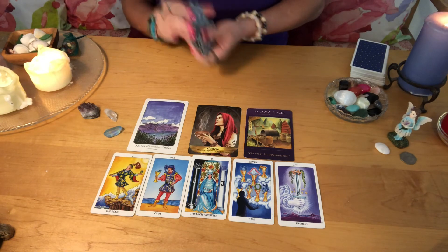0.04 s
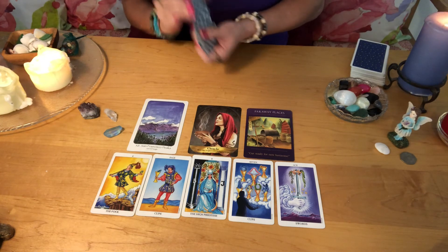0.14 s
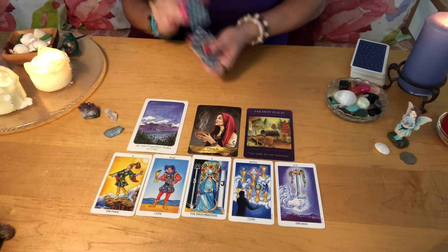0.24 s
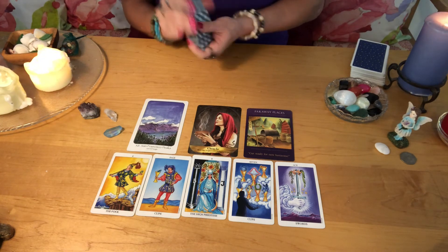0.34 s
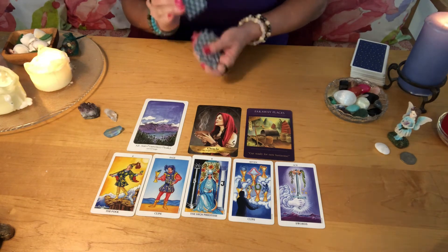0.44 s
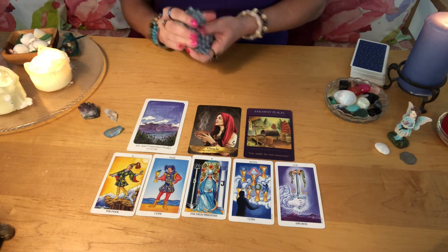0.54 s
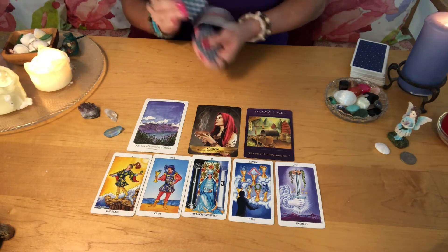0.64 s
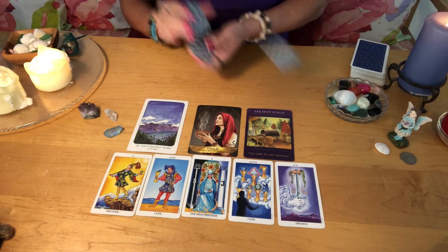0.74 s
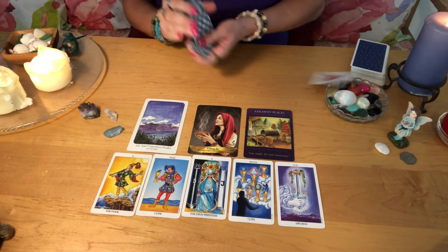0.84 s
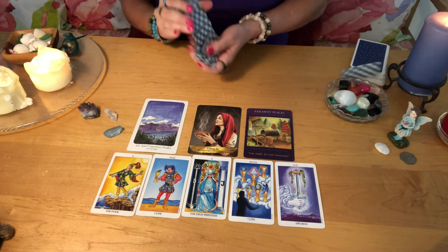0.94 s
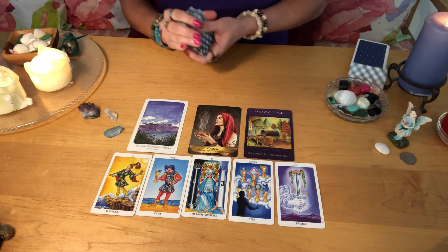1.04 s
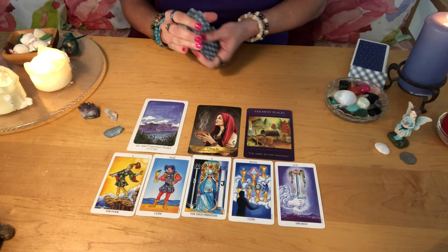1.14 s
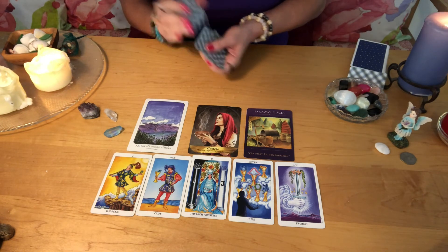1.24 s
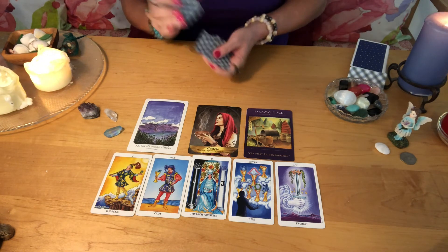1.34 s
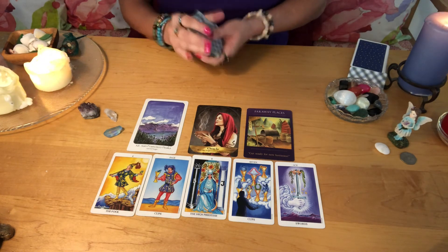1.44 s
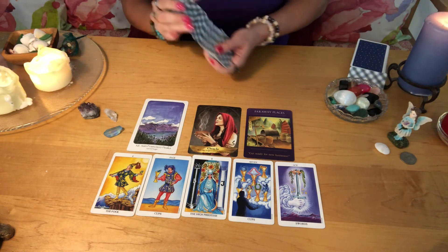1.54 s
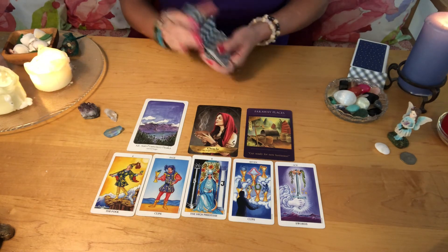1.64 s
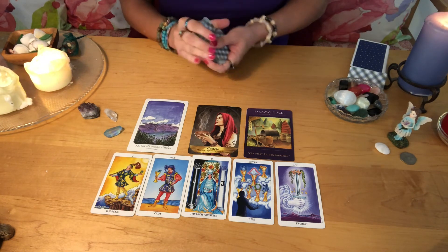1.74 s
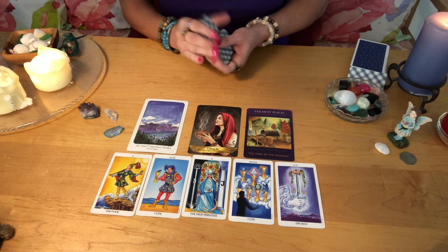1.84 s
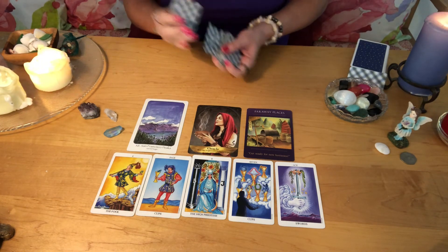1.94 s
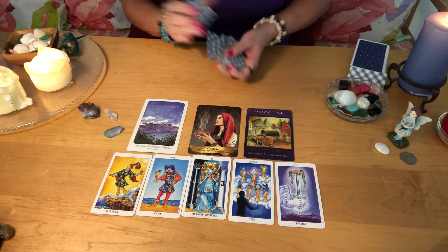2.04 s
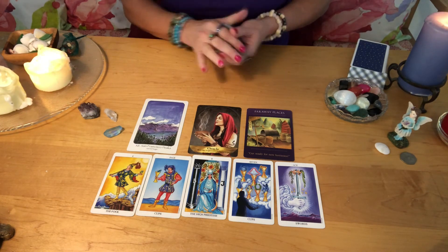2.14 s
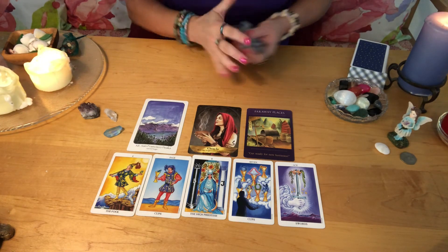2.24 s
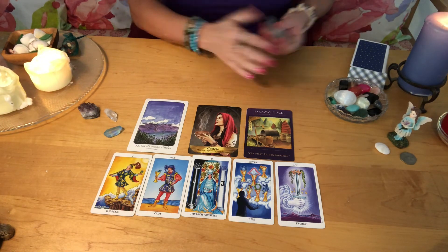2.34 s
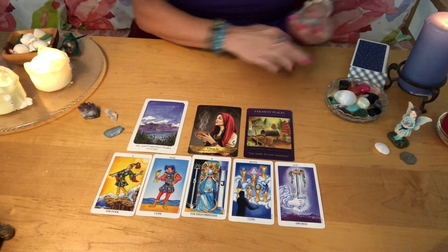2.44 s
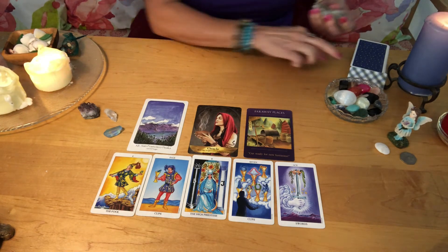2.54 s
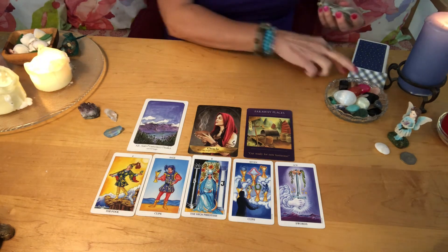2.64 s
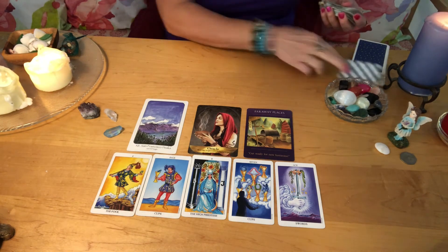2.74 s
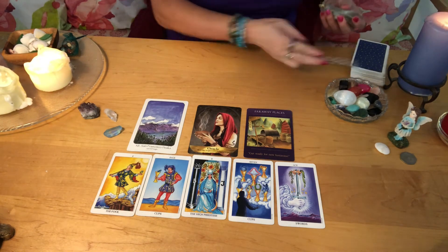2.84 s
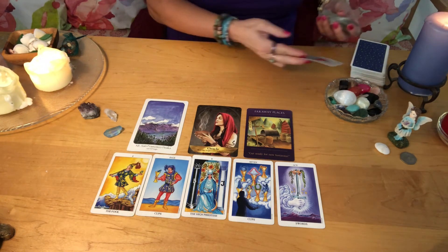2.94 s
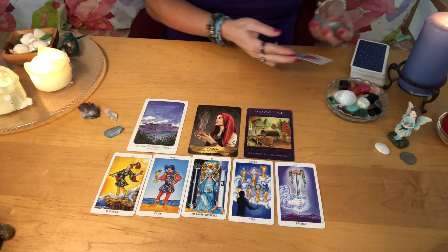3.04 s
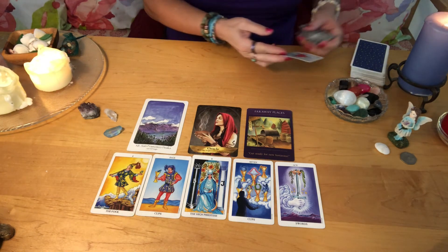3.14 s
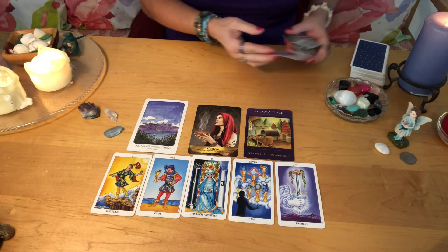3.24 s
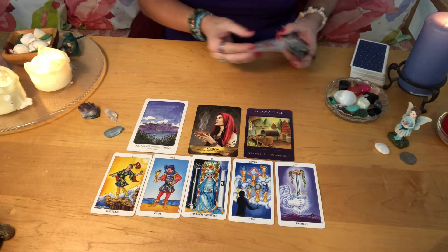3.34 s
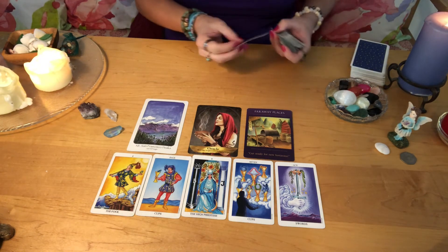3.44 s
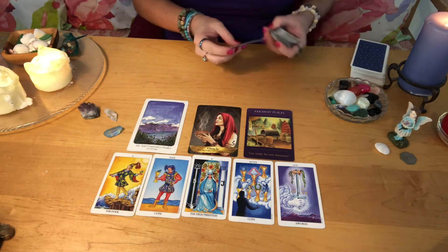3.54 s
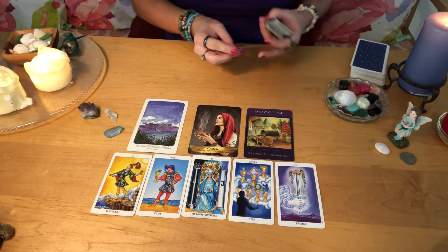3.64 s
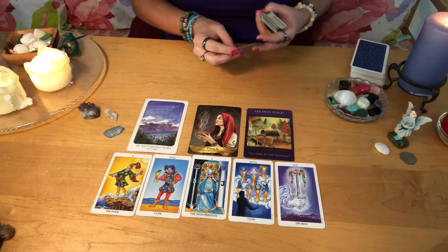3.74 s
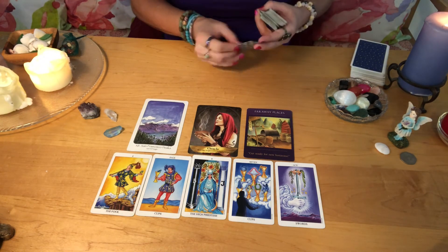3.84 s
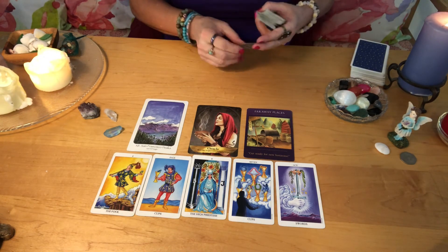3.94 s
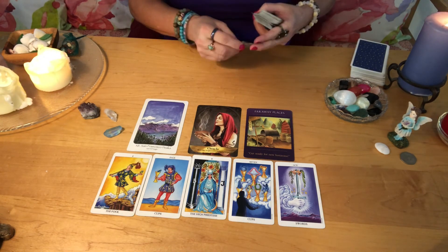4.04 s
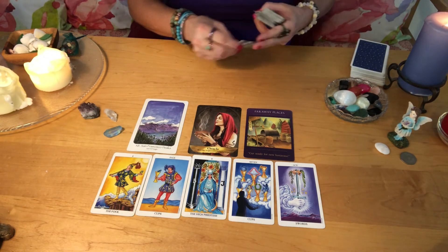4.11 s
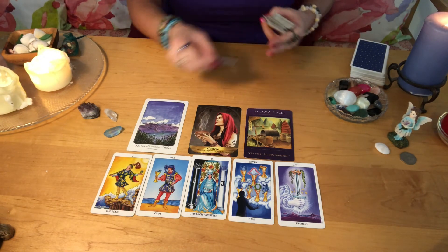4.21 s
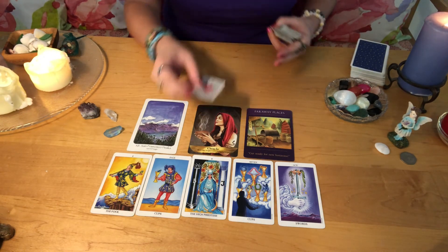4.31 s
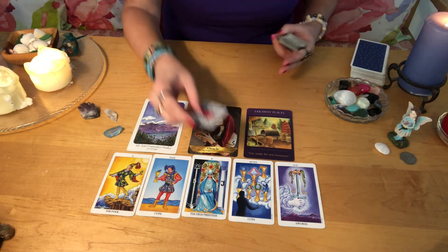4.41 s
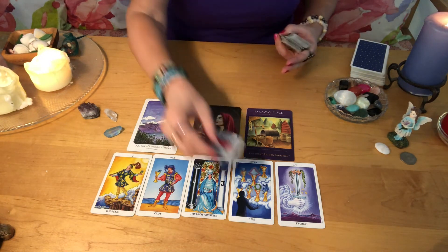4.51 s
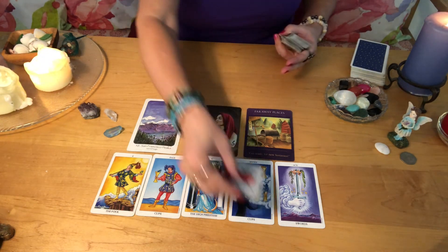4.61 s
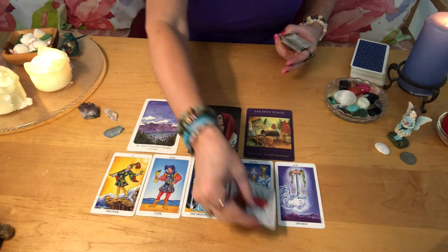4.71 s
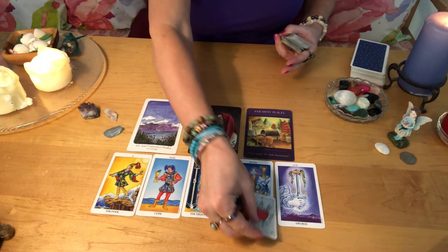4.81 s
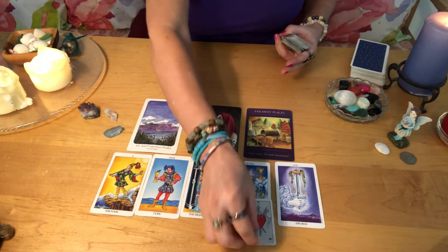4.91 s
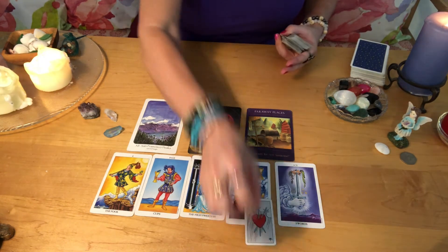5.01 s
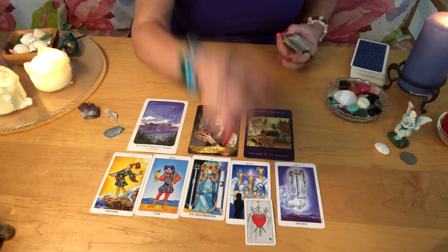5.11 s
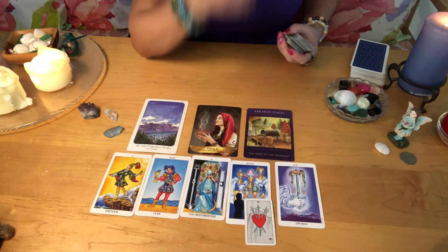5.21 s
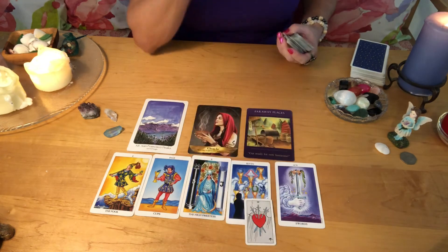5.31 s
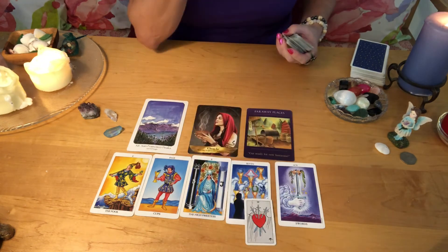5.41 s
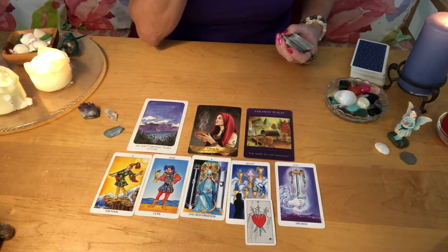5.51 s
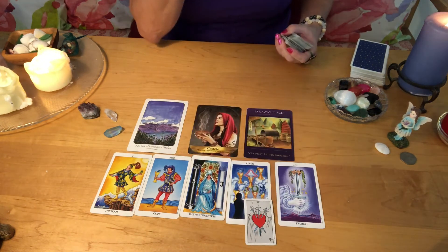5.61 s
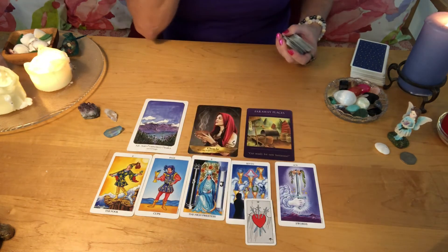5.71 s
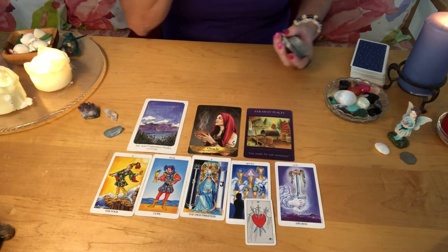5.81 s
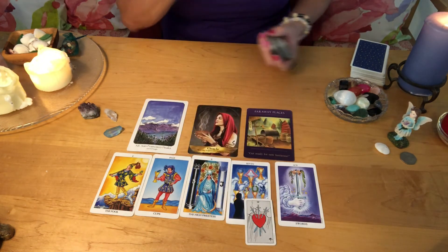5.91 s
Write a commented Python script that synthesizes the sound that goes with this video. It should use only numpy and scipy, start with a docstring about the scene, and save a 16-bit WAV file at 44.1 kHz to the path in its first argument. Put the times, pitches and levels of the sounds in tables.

```python
"""Tarot cards at a wooden table in a small, quiet room, close to the microphone.
For the first two seconds they are shuffled overhand: packets slide and clap onto the deck, and early on
a run of cards spills. The deck is squared with light ticks and rubs. Just after 4 s a stray card is
picked up and flicked; near 5 s one card is snapped down and the table top rings. Throughout, the walls
answer every click, and a low room rumble, mains hum and microphone hiss lie underneath."""
import sys
import numpy as np
from scipy import signal
from scipy.fft import rfft, irfft, next_fast_len
from scipy.io import wavfile
from scipy.ndimage import map_coordinates

SR = 44100
rng = np.random.default_rng(int(sys.argv[2]) if len(sys.argv) > 2 else 0)


def digitize_waveform(pressure):
    """Quantize a signal to 16-bit integers and store it at the path in sys.argv[1].

    Rows of a 2-D input are taken as channels; values are limited to [-1, 1].
    """
    field = np.atleast_2d(pressure).T
    bounded = np.clip(field, -1, 1)
    quanta = np.round(bounded * 32767).astype(np.int16)
    wavfile.write(sys.argv[1], SR, quanta)


N = 263012

HAND_ROOM_DB, TABLE_ROOM_DB = 0.5, -3  # room send from the hands, and from the table nearer the mic
TICK_T60_S = 0.019  # chatter of a light tick
LIGHT_SLAP_DB = -12.5  # a fingernail or a loose card hardly slaps

# Packets landing on the deck, close to the microphone: (time [s], level [dB], chatter t60 [s],
# flex pitch [Hz], slap [dB], edge [dB], slide-in level [dB], room send [dB])
PACKET_CLAPS = [(0.057, -29.5, 0.07, 2600, -11, -11, -56, 2),
                (0.1751, -28, 0.026, 3570, -2, -21, -41, -1.5),
                (0.2969, -20.5, .022, 2160, -14, -21, -48, 1.5),
                (0.3971, -21, 0.015, 4300, -5.5, -7, -46, 2.5),
                (.534, -24, 0.01, 3390, -9.5, -11.5, -60, 0),
                (0.6387, -24.5, 0.0097, 1240, -7, -12.5, -37.5, 0.5),
                (0.7752, -34, 0.028, 3200, -1.5, -16, -58, 2),
                (1.2472, -26.5, 0.019, 3370, -3, -29, -39, -1.5),
                (1.417, -26.5, 0.027, 4040, -7, -11.5, -53, 2.5),
                (1.6809, -20, .0026, 4570, -25, -37, -38.5, -18),
                (1.7445, -35, 0.023, 1730, -1.5, -15, -42.5, 1),
                (1.923, -31, .022, 1700, -3, -9, -47, -2.5), (2.221, -34.5, 0.011, 5050, -4, -6, -50, -1.5)]


def packets(deck_hz=402, deck_t60=0.02, deck_lag_s=0.00303, deck_db=-10.5):
    """Each packet slides in and claps onto the deck, which gives under it with a low knock."""
    contacts, strokes, pushes = [], [], []
    for s, db, t60, flex_hz, slap_db, edge_db, slide_db, room_db in PACKET_CLAPS:
        contacts.append((s, db, t60, flex_hz, slap_db, edge_db, room_db))
        strokes.append(slide_in(s, slide_db))
        pushes.append((s + deck_lag_s, db + slap_db + deck_db, deck_hz, deck_t60))
    return contacts, strokes, pushes


def spill(start_s=0.7842, gap_s=0.0155, count=5, db=-28, taper_db=5.5, flex_hz=3200):
    """A run of cards drops off the packet at an even pace, loudest midway."""
    t60, slap_db, edge_db = 0.012, -6, -13
    levels = db - taper_db * np.abs(np.linspace(-1, 1, count))
    return [(start_s + k * gap_s, level, t60, flex_hz, slap_db, edge_db, HAND_ROOM_DB)
            for k, level in enumerate(levels)]


SNAP_S, SNAP_DB = 4.8968, -16
# Corner, edge and face meeting the table:
# (time before the snap [s], level relative to it [dB], chatter t60 [s], slap [dB], edge [dB])
SNAP_LANDING = [(.0035, -10.5, .0012, -20.5, -8), (0.00079, -6.5, 0.0034, -8, -0.5),
                (0.00017, -1, 0.0077, -9, -9.5)]


def snap(flex_hz=7200, slide_db=-48):
    """The drawn card is snapped down near the microphone, landing in three quick contacts."""
    contacts = [(SNAP_S - early, SNAP_DB + db, t60, flex_hz, slap_db, edge_db, TABLE_ROOM_DB)
                for early, db, t60, slap_db, edge_db in SNAP_LANDING]
    return contacts, [slide_in(SNAP_S, slide_db)]


# Modes of the wooden table top: (pitch [Hz], level relative to the snap [dB], t60 [s])
TABLE_MODES = [(173, -42, .3), (345, -19, 0.028), (450, -35.5, 0.27)]


def table_top(lag_s=0.00287):
    """The snapped card sets the wood ringing."""
    return [(SNAP_S + lag_s, SNAP_DB + db, hz, t60) for hz, db, t60 in TABLE_MODES]


FLICK_S = 4.1468


def flick(db=-30.5, t60=0.013, flex_hz=4850, slap_db=-25, edge_db=-11, room_db=-8, slide_db=-49.5):
    """A bent card slips and springs free of the fingers with a click."""
    return [(FLICK_S, db, t60, flex_hz, slap_db, edge_db, room_db)], [slide_in(FLICK_S, slide_db)]


# Ringing bands of the flicked card: (centre [Hz], width [Hz], level [dB])
FLICK_BANDS = [(3540, 200, -58.5), (4350, 360, -50), (4870, 131, -60), (6200, 530, -62), (7850, 620, -60.5)]


def flick_ring(t60=0.36, attack_s=0.0015, twang_hz=4650, twang_db=-25, twang_s=0.00082, lag_s=0.00124):
    """The flicked card twangs for a few cycles and leaves a thin ring in a few narrow bands."""
    out, t = np.zeros(N), np.arange(-SR // 100, SR // 2) / SR
    after = np.maximum(t, 0)
    twang = amp(twang_db) * np.exp(-np.abs(t) / twang_s) * np.sin(2 * np.pi * twang_hz * t)
    ring = sum(amp(db) * noise_band(hz, width, len(t)) for hz, width, db in FLICK_BANDS)
    envelope = amp(-60 * after / t60) * (1 - np.exp(-after / attack_s))
    add(out, FLICK_S + lag_s + t[0], twang + ring * envelope)
    return out


# Light ticks, from single cards catching and two wall echoes just after louder clicks:
# (time [s], level [dB], flex pitch [Hz], slap [dB], edge [dB])
LIGHT_TICKS = [(.0097, -40.5, 1030, -9.5, -19), (.0828, -36, 2530, -10, -11), (.113, -39, 5000, -3, -7),
               (0.2861, -32.5, 2800, -7, -11), (0.8727, -34, 4960, -14, -15), (.992, -45.5, 1830, -6, -13),
               (1.041, -44.5, 2790, -7, -18), (1.0565, -41.5, 2760, -5, -16), (1.4277, -37, 960, -6, -7),
               (1.672, -26, 3450, -15.5, -14), (1.6905, -28.5, 3800, -7, -17),
               (1.8331, -41.5, 3130, -9, -9), (1.895, -31.5, 3660, -7, -7.5), (1.9077, -39, 1440, -10, -10),
               (2.1102, -40.5, 2160, -7, -9), (2.1345, -39.5, 3740, -4, -6),
               (2.6807, -42.5, 2850, -2.5, -22), (2.7026, -44.5, 2880, -17, -10),
               (2.7456, -38, 1130, -9.5, -6), (3.1914, -46.5, 5100, -1, -10), (3.505, -45, 2600, -25, -4.5),
               (3.7882, -51.5, 3700, -2, -12), (4.0748, -49.5, 2980, 0.5, -32),
               (4.3047, -39, 3850, -12.5, -9), (4.748, -53.5, 1930, -13, -29),
               (5.4091, -57.5, 3330, -4, -33)]


def light_ticks(slide_db=-17.5):
    """A brief, faint slide leads into each light tick."""
    contacts = [(s, db, TICK_T60_S, flex_hz, slap_db, edge_db, HAND_ROOM_DB)
                for s, db, flex_hz, slap_db, edge_db in LIGHT_TICKS]
    return contacts, [slide_in(s, db + slide_db) for s, db, *_ in LIGHT_TICKS]


# Fingernails on a card's edge: (time [s], level [dB])
NAIL_CLICKS = [(2.8171, -54), (2.8328, -46), (2.9253, -59.5), (5.182, -46.5), (5.2, -56)]


def fingernails(t60=0.01, flex_hz=8700, edge_db=12):
    """A nail's click sounds mostly the cut edge, well above the bending."""
    return [(s, db - edge_db, t60, flex_hz, LIGHT_SLAP_DB, edge_db, TABLE_ROOM_DB)
            for s, db in NAIL_CLICKS]


# Cards drawn across each other:
# (peak time [s], swell and fade time [s], level [dB], flex pitch [Hz], edge hiss [dB])
CARD_RUBS = [(.02, 0.026, -53, 1500, -17), (.372, .042, -45, 3200, -13.5), (.488, 0.04, -48, 4460, -24),
             (.782, .006, -35.5, 2370, -17), (.85, 0.036, -51, 2810, -17), (1.068, 0.021, -51, 2490, -16),
             (1.103, 0.0057, -42.5, 3800, -13), (1.183, 0.024, -45.5, 4000, -15),
             (1.455, 0.023, -57, 3400, -5), (1.5584, .012, -59, 7510, 4.5),
             (1.708, 0.021, -40.5, 2280, -24), (1.882, .016, -48, 4200, -12),
             (2.136, 0.0081, -40, 3370, -14), (2.182, .012, -47.5, 2640, -26), (2.69, .016, -57, 2620, -13),
             (3.501, 0.0076, -52.5, 2200, -18), (3.83, 0.15, -71.5, 5470, -5),
             (4.06, 0.032, -64.5, 4560, -7), (4.301, .006, -48, 3050, -11),
             (4.555, .02, -57.5, 2390, -11.5), (4.862, 0.025, -52, 3800, -10),
             (5.792, .013, -63.5, 4240, -12.5)]


def rubs(loose_count=4, loose_db=-3, spread_db=3.5, scatter=1.4):
    """A rub swells and fades while a few loose cards tick at random under it."""
    contacts, strokes = [], []
    for s, length, db, flex_hz, edge_db in CARD_RUBS:
        strokes.append((s, length, length, db, flex_hz, edge_db))
        times = s + scatter * length * rng.uniform(-1, 1, loose_count)
        levels = db + loose_db + spread_db * rng.standard_normal(loose_count)
        for when, level in zip(times, levels):
            contacts.append((when, level, TICK_T60_S, flex_hz, LIGHT_SLAP_DB, edge_db, HAND_ROOM_DB))
    return contacts, strokes


def squeak(peak_s=0.49, spread_s=0.056, hz=4560, width_hz=240, db=-58):
    """One long slide sings thinly in a narrow band."""
    out, t = np.zeros(N), np.arange(-SR // 5, SR // 5) / SR
    swell = np.exp(-(t / spread_s) ** 2)
    add(out, peak_s + t[0], amp(db) * swell * noise_band(hz, width_hz, len(t)))
    return out


# Spectra at the microphone, each (frequency [Hz], level [dB])
FLEX_SPECTRUM = [(251, -17.5), (901, 0), (2201, 2), (5001, -0.5), (7801, -2.5), (8501, -13), (16001, -18)]  # the card's bending as the microphone hears it, duller above 8 kHz
SLAP_SPECTRUM = [(110, -38), (240, -10), (380, -2), (600, 0), (1000, -0.5), (1500, -9), (3000, -32),
                 (8000, -52.5)]  # air between flat faces
EDGE_SPECTRUM = [(2001, -41), (5501, -6.5), (7501, -8.5), (8601, 1.5), (10801, -3.5), (13001, -5.5),
                 (16001, -7)]  # the cut edge


def card(push, flex_hz, slap_db, edge_db, broad_q, peak_gain, peak_q=7, lag_s=0.000812):
    """A pushed card sounds a broad bending resonance with a narrow peak, a low slap and a bright edge."""
    hz = np.fft.rfftfreq(len(push), 1 / SR) + 1
    detune = hz / flex_hz - flex_hz / hz
    resonance = 1 / (1 + 1j * broad_q * detune) + peak_gain / (1 + 1j * peak_q * detune)
    stiffness = (flex_hz / 3200) ** 0.52  # a tighter grip raises the slap too
    drive = rfft(push)
    bend = unit(drive * resonance * amp(along(FLEX_SPECTRUM, hz)))
    slap = amp(slap_db) * unit(drive * amp(along(SLAP_SPECTRUM, hz / stiffness)))
    edge = amp(edge_db) * unit(drive * amp(along(EDGE_SPECTRUM, hz)))
    # bending waves are slower at low pitch: the delay (lag_s at 1 kHz) falls with the root of frequency
    travel = np.exp(-4j * np.pi * lag_s * np.sqrt(1000 * hz))
    return irfft((bend + slap + edge) * travel, len(push))


def clicks(contacts, strike=3.32, scuff=0.52, scuff_s=0.0014, lead_s=0.00017, trim_db=-1.26):
    """Each contact is a short scuff, a sharp strike and a chatter of the cards behind it."""
    direct, diffuse = np.zeros(N), np.zeros(N)
    t = np.arange(-400, 1648) / SR
    impulse = 1.0 * (t == 0)
    for s, db, t60, flex_hz, slap_db, edge_db, room_db in contacts:
        force = np.where(t < 0, scuff * np.exp(-np.abs(t) / scuff_s), amp(-60 * np.abs(t) / t60))
        push = force * rng.standard_normal(len(t)) + strike * impulse
        gain = amp(db + trim_db) * np.sqrt(SR / 1000)  # energy counted over 1 ms
        start = s - lead_s + t[0]
        add(direct, start, gain * card(push, flex_hz, slap_db, edge_db, broad_q=1.03, peak_gain=0.95))
        # the room gathers sound from all directions, so the chatter's ripples average out
        thrown = card(impulse, flex_hz, slap_db, edge_db, broad_q=0.84, peak_gain=0.39)
        add(diffuse, start, room(gain * amp(room_db) * thrown))
    return direct, diffuse


def slide_in(s, db, lead_s=0.003, rise_s=0.0096, fall_s=0.0032, flex_hz=3400, edge_db=-8.5):
    """The short stroke that swells and stops just before a contact at time s."""
    return (s - lead_s, rise_s, fall_s, db, flex_hz, edge_db)


def slides(strokes, grain_db=3, clump_db=3.5, slap_db=-11, trim_db=-4.5):
    """Sliding faces catch and slip in tiny grains that swell and die with the stroke."""
    direct, diffuse = np.zeros(N), np.zeros(N)
    t = np.arange(-8192, 8192) / SR
    for s, rise, fall, db, flex_hz, edge_db in strokes:
        envelope = np.exp(-np.abs(t / np.where(t < 0, rise, fall)) ** 0.91)
        friction = envelope * rng.standard_normal(len(t))
        grains = amp(grain_db * wobble(850, len(t)) + clump_db * wobble(168.4, len(t)))
        gain = amp(db + trim_db) * np.linalg.norm(envelope)
        rub = gain * card(friction * grains, flex_hz, slap_db, edge_db, broad_q=0.71, peak_gain=0.3)
        add(direct, s + t[0], rub)
        add(diffuse, s + t[0], room(rub))
    return direct, diffuse


# Soft bumps of hand and table: (time [s], level [dB], pitch [Hz], t60 [s])
HAND_BUMPS = [(1.7421, -59, 60, .1), (2.2246, -32, 348, 0.01), (4.3762, -54, 167, 0.16)]


def knocks(pushes, attack_s=0.0004):
    """Each push or hand bump gives a damped low tone in deck or table; little radiates below it."""
    out, t = np.zeros(N), np.arange(SR // 3) / SR
    for s, db, hz, t60 in pushes + HAND_BUMPS:
        envelope = amp(db - 60 * t / t60) * (1 - np.exp(-t / attack_s))
        low_cut = signal.butter(2, hz / 2, "high", fs=SR)
        add(out, s, signal.lfilter(*low_cut, envelope * np.sin(2 * np.pi * hz * t)))
    return out


# Reflections at the microphone: (delay [s], level [dB])
WALL_ECHOES = [(0.01, -30), (0.012, -13), (0.016, -23.5), (.0216, -36)]


def walls(direct, trim_db=-3):
    """The nearest walls return the first echoes."""
    out = np.zeros(N)
    for delay, db in WALL_ECHOES:
        add(out, delay, amp(db + trim_db) * direct)
    return out


# Reverberation of the small room: (frequency [Hz], t60 [s])
ROOM_DECAY = [(201, 1), (601, 0.4), (2001, 0.48), (6001, 0.35), (14001, 0.3)]


def room(x, tail_db=-11, onset_s=0.0077):
    """The diffuse answer of the room to one sound, a fresh smooth noise tail each time."""
    hz, t = np.fft.rfftfreq(256, 1 / SR), np.arange(112) * 128 / SR
    decay = amp(-60 * t / along(ROOM_DECAY, hz)[:, None])
    build_up = 1 - np.exp(-(t / onset_s) ** 2)
    real, imaginary = rng.standard_normal((2,) + decay.shape)
    tail = signal.istft((real + 1j * imaginary) * decay * build_up, SR, nperseg=256)[1]
    return amp(tail_db) * signal.fftconvolve(x, tail / np.linalg.norm(tail))


# Noise floor at the microphone: (frequency [Hz], relative level [dB])
FLOOR_SPECTRUM = [(26, -21), (41, -10.5), (61, 0), (151, 1), (321, 0.5), (451, -5), (701, -9.5),
                  (1201, -15.5), (3001, -20), (7501, -21), (9001, -26.5), (15001, -28)]


def room_tone(rms_db=-65.68):
    """Steady low room rumble with microphone hiss above it."""
    noise = filtered(rng.standard_normal(N), lambda hz: amp(along(FLOOR_SPECTRUM, hz)))
    return amp(rms_db) * unit(noise)


# Tones of an appliance in the room: (frequency [Hz], level [dB])
HUM_TONES = [(119.8, -75), (172, -78), (242, -80)]


def mains_hum(waver_db=5, drift_rad=0.98):
    """An appliance hums faintly, each tone unsteady in level and phase."""
    out, t = np.zeros(N), np.arange(N) / SR
    for hz, db in HUM_TONES:
        gain = amp(db + waver_db * wobble(4.07, N))
        phase = 2 * np.pi * hz * t + drift_rad * wobble(3.23, N)
        out += gain * unit(np.sin(phase))
    return out


def amp(db):
    """Decibels to gain."""
    return 10 ** (np.asarray(db) / 20)


def unit(x):
    """x at rms 1."""
    return x / np.sqrt(np.mean(np.abs(x) ** 2) + 1e-20)


def along(points, hz):
    """(frequency [Hz], value) points read on a log axis."""
    frequencies, values = np.transpose(points)
    return np.interp(np.log(hz + 1), np.log(frequencies + 1), values)


def wobble(rate, size):
    """A smooth random curve, rate knots a second."""
    knots = rng.standard_normal(int(size * rate / SR) + 4)
    return map_coordinates(knots, [np.arange(size) * rate / SR])


def filtered(x, response):
    """x shaped by a gain that depends on frequency."""
    size = next_fast_len(len(x) + 2048)
    return irfft(rfft(x, size) * response(np.fft.rfftfreq(size, 1 / SR)), size)[:len(x)]


def noise_band(hz, width_hz, size):
    """A narrow band of noise at rms 1."""
    return unit(filtered(rng.standard_normal(size), lambda f: 1 / (1 + (2 * (f - hz) / width_hz) ** 2)))


def add(track, s, x):
    """Mix x into the track from time s on."""
    i = round(s * SR)
    x, i = x[max(-i, 0):], max(i, 0)
    track[i:i + len(x)] += x[:max(len(track) - i, 0)]


def scene():
    """One microphone at the table: cards close by, the walls beyond, room tone and hum behind."""
    claps, packet_slides, deck_pushes = packets()
    flicks, flick_slides = flick()
    snaps, snap_slides = snap()
    ticks, tick_slides = light_ticks()
    loose_ticks, long_slides = rubs()
    contacts = claps + flicks + snaps + spill() + ticks + fingernails() + loose_ticks
    strokes = packet_slides + flick_slides + snap_slides + tick_slides + long_slides
    close_clicks, room_clicks = clicks(contacts)
    close_slides, room_slides = slides(strokes)
    direct = close_clicks + close_slides + knocks(deck_pushes + table_top())
    reflected = walls(direct) + room_clicks + room_slides
    return (direct + reflected + flick_ring() + squeak() + room_tone() + mains_hum())[None]


def record(dry, top_hz=16150):
    """The recorder cuts off steeply at its band limit."""
    return np.array([filtered(channel, lambda hz: 1 / np.sqrt(1 + (hz / top_hz) ** 160))
                     for channel in dry])


dry = scene()
out = record(dry)
digitize_waveform(out)
```